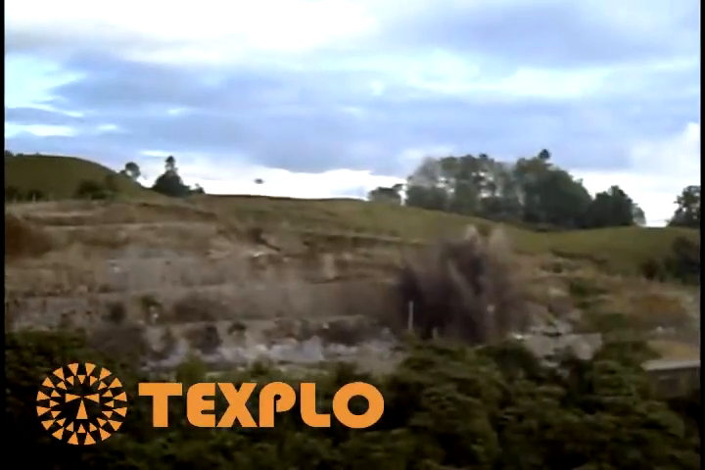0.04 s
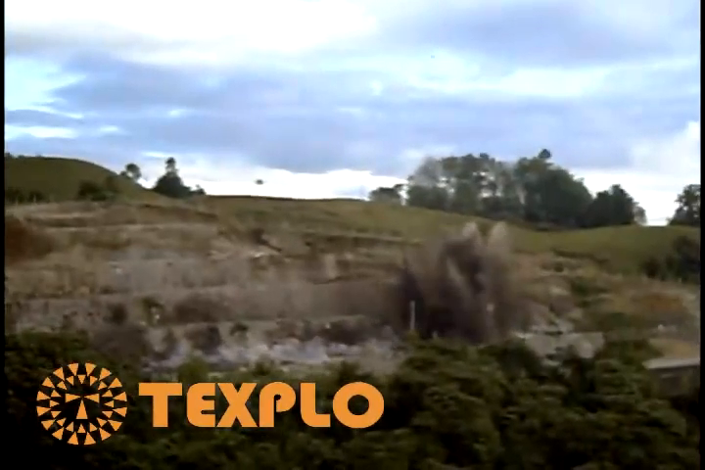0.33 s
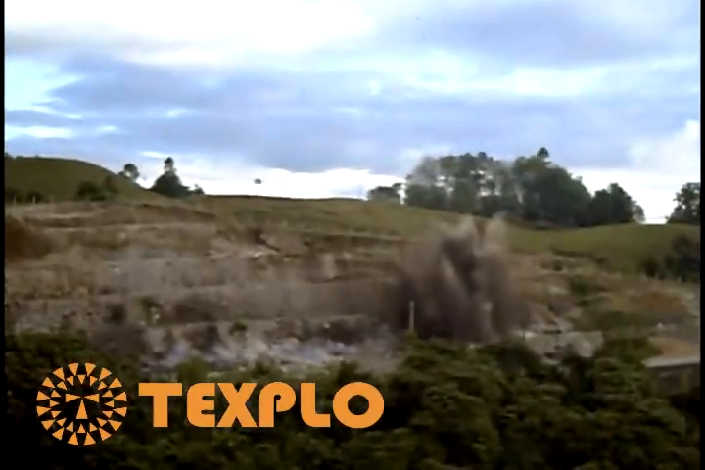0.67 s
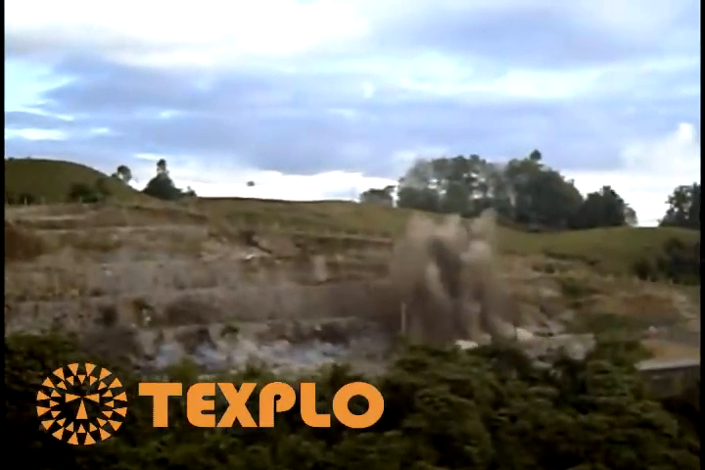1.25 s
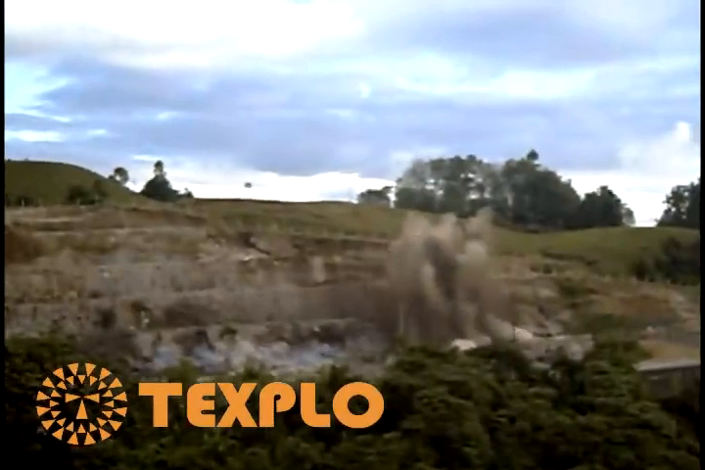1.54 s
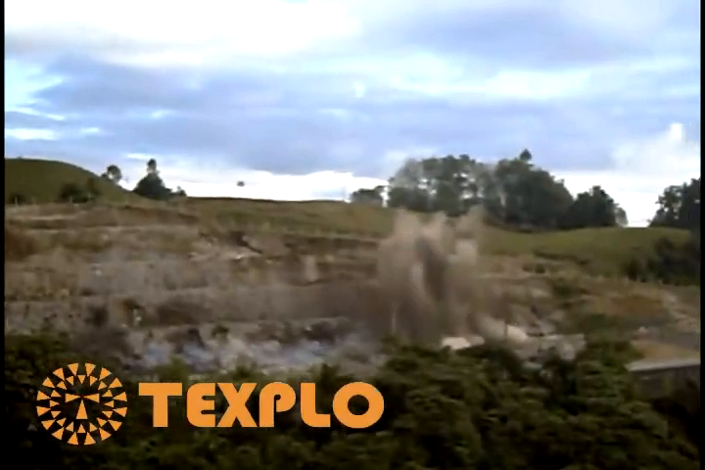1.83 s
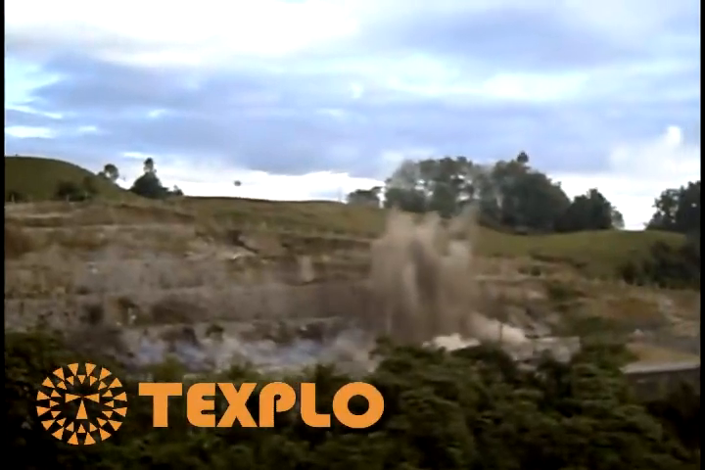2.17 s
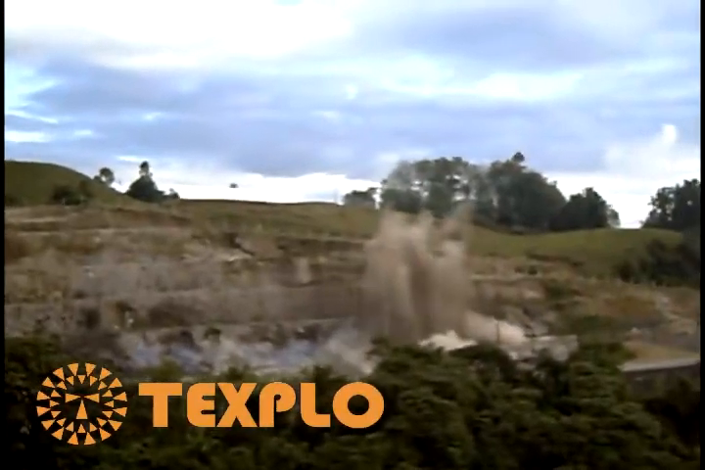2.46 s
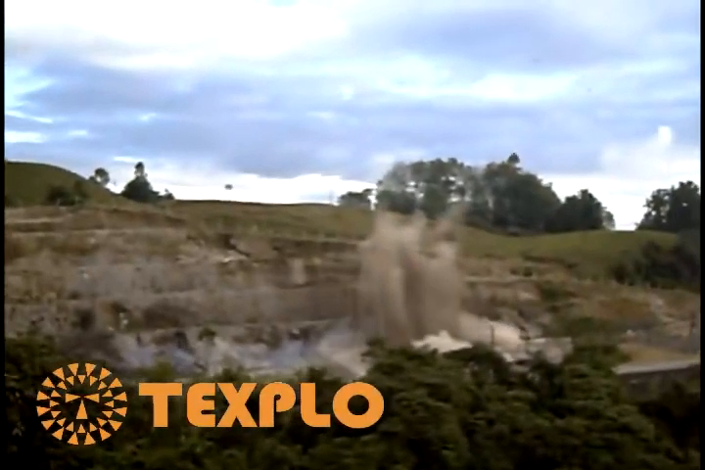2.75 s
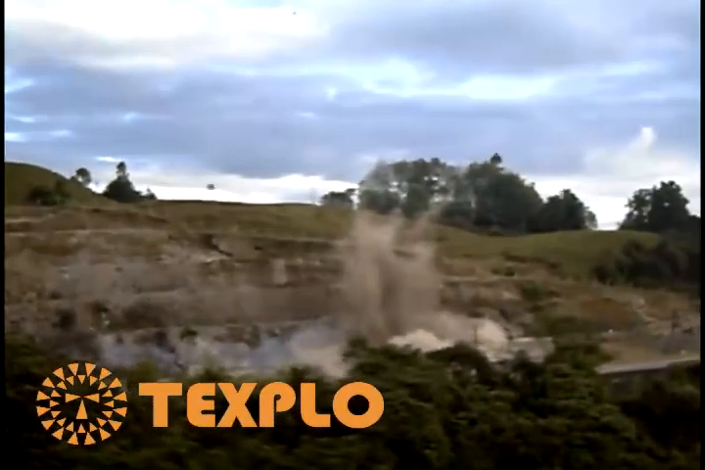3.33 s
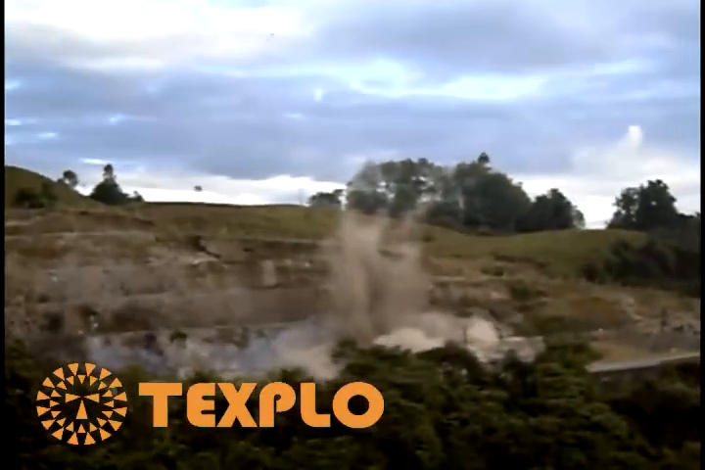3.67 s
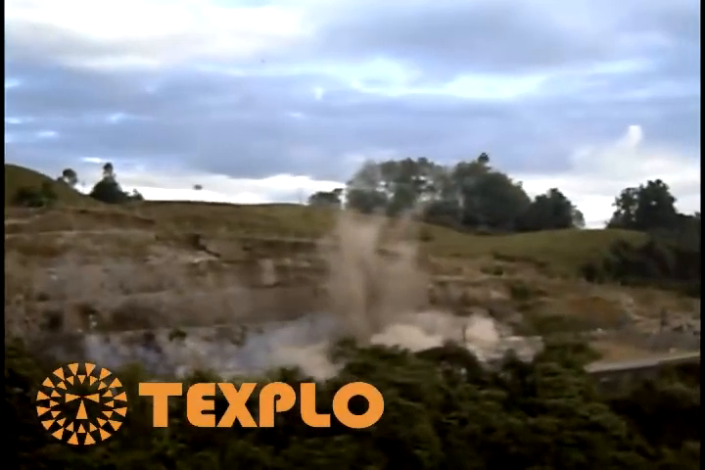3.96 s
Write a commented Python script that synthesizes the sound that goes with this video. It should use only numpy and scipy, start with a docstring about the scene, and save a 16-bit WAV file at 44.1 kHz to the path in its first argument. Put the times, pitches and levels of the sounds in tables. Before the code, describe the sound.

A distant quarry blast rumbles away with falling rock, fading into steady wind.

```python
"""A deep rumble and a dull roar die away: the tail of a quarry blast, far across a valley.
The blast rolls around the hills while broken rock pours down the face, thousands of blows merging
into one roar, with a rattle of gravel on top that loses its treble as the slide slows.
Single boulders go on thudding and stones clacking on the pile, over a wind that rises and holds."""
import sys
import numpy as np
from scipy import signal
from scipy.fft import rfft, irfft, next_fast_len
from scipy.io import wavfile

SR = 44100
rng = np.random.default_rng(int(sys.argv[2]) if len(sys.argv) > 2 else 0)


def dump(signal):
    """Clip the signal to [-1, 1] and save it as 16-bit WAV at the path in sys.argv[1]."""
    limited = np.clip(np.atleast_2d(signal).T, -1, 1)
    pcm = np.round(limited * 32767).astype(np.int16)
    wavfile.write(sys.argv[1], SR, pcm)


N = 176400
T = np.arange(N) / SR


def from_db(db):
    """Decibels to gain."""
    return 10 ** (np.asarray(db) / 20)


def unit_rms(x):
    """Scale to an rms of one."""
    return x / np.sqrt(np.mean(x ** 2) + 1e-20)


def envelope(rows):
    """Join rows of seconds and value by straight lines."""
    return np.interp(T, *np.transpose(rows))


def drift(rate_hz):
    """A smooth random wander of unit rms, mostly slower than the given rate."""
    hop, run_in = 40, 2000  # samples per step, steps
    pole = np.exp(-2 * np.pi * rate_hz * hop / SR)
    steps = rng.standard_normal(N // hop + run_in + 2)
    slow = signal.lfilter([1], [1, -2 * pole, pole * pole], steps)[run_in:]
    return np.interp(np.arange(N) / hop, np.arange(len(slow)), unit_rms(slow))


def colour(x, spectrum):
    """Shape a sound with an EQ curve of Hz and dB; the result has unit rms."""
    size = next_fast_len(2 * N)
    hz, db = np.transpose(spectrum)
    bin_hz = np.arange(size // 2 + 1) * SR / size
    gain = unit_rms(from_db(np.interp(np.log(bin_hz + 1), np.log(hz), db)))
    # minimum phase, so nothing rings ahead of a hit
    cepstrum = irfft(np.log(gain), size)
    cepstrum[1:size // 2] *= 2
    cepstrum[size // 2 + 1:] = 0
    return unit_rms(irfft(rfft(x, size) * np.exp(rfft(cepstrum)), size)[:N])


def noise(spectrum):
    """Coloured noise of unit rms."""
    return colour(rng.standard_normal(N), spectrum)


def low_pass(x, edge_hz):
    """Second-order treble roll-off."""
    return signal.sosfilt(signal.butter(2, edge_hz, fs=SR, output="sos"), x)


def impacts(per_s, spread_db, echo_t60_s=0.14, echo_db=-2):
    """Random blows of uneven size, each trailing its own diffuse echo off the quarry face."""
    sizes = from_db(spread_db * np.minimum(rng.exponential(1, N), 4)) * rng.choice([-1, 1], N)
    blows = sizes * (rng.random(N) < per_s / SR)
    decay = from_db(-60 / (echo_t60_s * SR)) ** 2
    echo_power, _ = signal.lfilter([1 - decay], [1, -decay], blows ** 2, zi=[np.mean(blows ** 2)])
    echo = from_db(echo_db) * np.sqrt(echo_power) * rng.standard_normal(N)
    return unit_rms(blows + echo)


def knock(start_s, peak_db, t60_s, low_hz, high_hz):
    """A rock hits and crumbles: a sharp contact and a dying burst, in the band that its size sets."""
    age = T - start_s
    contact = from_db(22) * (np.arange(N) == int(start_s * SR))
    crumble = rng.standard_normal(N) * (age >= 0) * from_db(-60 * np.clip(age / t60_s, 0, 10))
    band = signal.butter(2, [low_hz, high_hz], "band", fs=SR, output="sos")
    hit = signal.sosfilt(band, contact + crumble)
    return from_db(peak_db) * hit / np.max(np.abs(hit))


def wind(flutter_db):
    """Air rushing through the trees fades in to a nearly steady, lightly fluttering bed."""
    # The wind's rise. Each row: time in seconds, level in dB.
    swell = [(0, -70), (1.5, -52.5), (2.2, -50.5), (3.3, -50), (3.95, -48)]
    # Tone of the rush. Each row: frequency in Hz, relative level in dB.
    tone = [(15, -4.5), (90, 3), (300, -1.5), (850, -7), (1150, -14), (1400, -20.5), (1620, -18),
            (2100, -16), (2500, -19), (2900, -28.5), (3400, -29.5), (4100, -25.5), (4900, -37),
            (6000, -28.5), (6700, -34.5), (7400, -69), (14000, -56.5)]
    return from_db(envelope(swell) + flutter_db * drift(rate_hz=7.2)) * noise(tone)


def settling_pile():
    """Loose rubble keeps tumbling on the pile."""
    # Stirring of the rubble. Each row: time in seconds, level in dB.
    stir = [(0, -55), (1.6, -54.5), (1.72, -51.5), (1.95, -53.5), (2.25, -52.5), (2.5, -55), (2.7, -50.5),
            (2.95, -51.5), (3.3, -53.5), (3.6, -51.5), (4, -57.5)]
    # Tone of the rubble. Each row: frequency in Hz, relative level in dB.
    tone = [(25, -9.5), (60, -2.5), (85, 2), (150, -2.5), (205, -4.5), (280, -4), (400, 0.5), (520, -8.5),
            (660, -3.5), (920, -4.5), (1300, -22), (2200, -19.5), (3000, -36.5), (4200, -34.5),
            (8000, -67.5)]
    return from_db(envelope(stir)) * colour(impacts(per_s=420, spread_db=3.5), tone)


def stone_clacks(t60_s=0.032, width_octaves=0.47):
    """Stone knocks on stone with a short, bright clack."""
    # The clacks. Each row: start in seconds, peak level in dB, pitch in Hz.
    hits = [(2.087, -44.5, 1910), (2.292, -51, 2050), (2.747, -57, 3900), (2.827, -54, 2000),
            (2.900, -45.5, 2010), (2.989, -50, 2900), (3.105, -46, 2130), (3.154, -55, 3600),
            (3.189, -47, 1950), (3.296, -45, 2030), (3.350, -48, 2100), (3.873, -56, 4000),
            (3.933, -45, 2220)]
    half_band = 2 ** (width_octaves / 2)
    return sum(knock(start, db, t60_s, hz / half_band, hz * half_band) for start, db, hz in hits)


def gravel(edge_hz=2870, treble_half_life_s=1.0):
    """Small chips rattle down with the slide and grow duller as it slows."""
    # Fade of the rattle. Each row: time in seconds, level in dB before the dulling.
    fade = [(0, -40), (.11, -43.5), (.15, -42), (.187, -37), (.21, -40.5), (.3, -40.5), (.37, -45),
            (.78, -45.5), (.9, -51.5), (1.05, -52), (1.3, -57.5), (1.55, -61), (2, -79)]
    # Opening tone of the chips. Each row: frequency in Hz, relative level in dB.
    tone = [(700, -22.5), (1380, -7), (1570, 0), (1760, 0.5), (1970, -5.5), (2250, -4), (2750, -13),
            (3200, -12.5), (4200, -22), (5500, -23), (6700, -30), (7400, -44.5), (10500, -50), (12500, -62),
            (15500, -75)]
    chips = colour(impacts(per_s=3200, spread_db=0.5), tone)
    # filtered both ways, the body stays in phase and subtracts cleanly
    body = low_pass(low_pass(chips, edge_hz)[::-1], edge_hz)[::-1]
    treble = (chips - body) * 2 ** (-T / treble_half_life_s)
    return from_db(envelope(fade)) * (body + treble)


def rumble():
    """The blast rolls around the hills in deep, fading surges."""
    # The surges. Each row: time in seconds, level in dB.
    surges = [(0, -24), (.12, -34.5), (.22, -25.5), (.33, -34), (.45, -34), (.62, -32.5), (.76, -41.5),
              (.86, -43), (1.07, -41.5), (1.22, -54.5), (1.43, -46), (1.58, -54.5), (1.7, -48.5),
              (2.3, -56), (4, -63)]
    # Bass-heavy tone. Each row: frequency in Hz, relative level in dB.
    tone = [(6, -2), (14, 7), (28, -5), (44, 2), (65, -6), (100, -9.5), (160, -39), (400, -89)]
    return from_db(envelope(surges)) * noise(tone)


def boulders():
    """Big blocks thump down, the heavier the deeper; distance takes off their treble."""
    # The landings. Each row: start in seconds, peak in dB before the low-pass,
    # seconds to fall 60 dB, lower and upper band edge in Hz.
    landings = [(.014, -16, .18, 80, 174), (0.057, -23, 0.09, 110, 260), (.104, -26.5, 0.061, 65, 130),
                (0.167, -22, 0.11, 120, 215), (0.237, -25.5, 0.067, 105, 190), (0.287, -22, 0.2, 172, 376),
                (0.315, -26, 0.15, 45, 129), (.41, -29, 0.062, 170, 480), (.516, -28.5, .12, 150, 280),
                (0.552, -26.5, 0.085, 46, 150), (0.726, -22.5, .08, 105, 560), (.765, -26, .14, 161, 262),
                (0.818, -29, 0.054, 102, 188), (.862, -29.5, 0.14, 131, 320), (1.022, -41, 0.029, 220, 600),
                (1.052, -34, 0.29, 75, 180), (1.119, -35.5, 0.17, 130, 256), (1.16, -33.5, 0.6, 130, 540),
                (1.42, -36.5, .14, 128, 283), (1.683, -33.5, 0.073, 200, 900), (1.729, -44, 0.058, 60, 170),
                (1.772, -39.5, .04, 280, 596), (1.84, -37, 0.084, 66, 160), (1.907, -32, 0.078, 95, 560),
                (1.941, -38, 0.1, 71, 234), (2.019, -38, 0.11, 130, 900), (2.037, -35, 0.036, 70, 234),
                (2.349, -35.5, 0.13, 300, 1000), (2.612, -37, .12, 220, 805), (2.668, -30, .07, 80, 950),
                (2.744, -36, 0.09, 90, 517), (3.022, -39.5, .05, 110, 276), (3.487, -37.5, 0.031, 250, 550),
                (3.504, -34, .06, 600, 1200), (3.646, -41, .07, 160, 290), (3.846, -43, .06, 150, 600)]
    return low_pass(sum(knock(*row) for row in landings), edge_hz=690)


def rock_slide(trim_db=-1, tail_db_per_s=17):
    """Thousands of blocks pour down the face and merge into a dull roar."""
    # Flow of rock. Each row: time in seconds, level in dB before the trim.
    flow = [(0, -27.5), (.11, -30), (.2, -28.5), (.3, -29.5), (.42, -31.5), (.68, -31.5), (.84, -34.5),
            (.95, -38.5), (1.17, -40.5), (1.24, -42), (1.38, -45.5), (1.46, -43), (1.6, -50.5)]
    # Tone of the roar. Each row: frequency in Hz, relative level in dB.
    tone = [(50, -16.5), (105, -4), (140, -1.5), (190, -4), (235, -1), (290, -7), (380, -6), (470, -5.5),
            (590, -6.5), (700, -7), (880, -6.5), (1060, -11), (1350, -21), (2200, -33.5), (5000, -72.5)]
    tail_s = np.maximum(T - flow[-1][0], 0)
    level_db = envelope(flow) - tail_db_per_s * tail_s + trim_db
    return from_db(level_db) * colour(impacts(per_s=2500, spread_db=1.0), tone)


def scene():
    """The collapse, the settling and the wind, mixed in mono at one distant spot."""
    collapse = rumble() + rock_slide() + gravel() + boulders()
    settling = settling_pile() + stone_clacks()
    return (collapse + settling + wind(flutter_db=1.37))[None]


def record(dry, hiss_db=-81, cutoff_hz=15700):
    """The recorder adds faint hiss and cuts the very top."""
    # Tone of the hiss. Each row: frequency in Hz, relative level in dB.
    tone = [(3000, -4), (7500, 2), (8800, -1), (9700, 3.5), (10400, 1.5), (10900, 7.5), (11350, 2.5),
            (11650, -12), (13300, -10.5), (15500, -18)]
    top_cut = signal.ellip(10, .2, 80, cutoff_hz, fs=SR, output="sos")
    return signal.sosfilt(top_cut, dry + from_db(hiss_db) * noise(tone))


dry = scene()
out = record(dry)
dump(out)
```